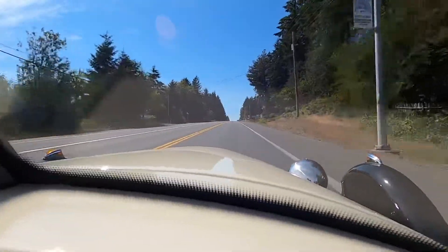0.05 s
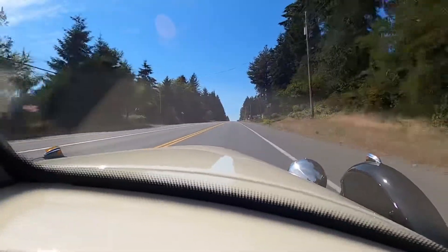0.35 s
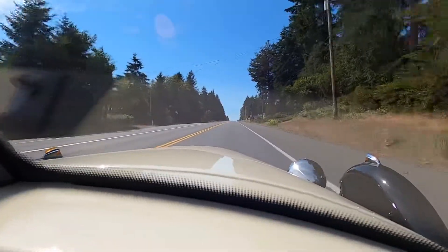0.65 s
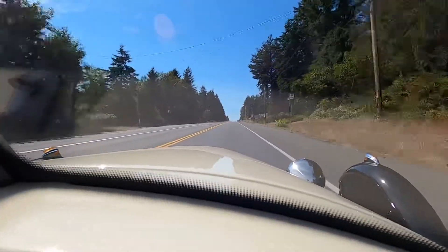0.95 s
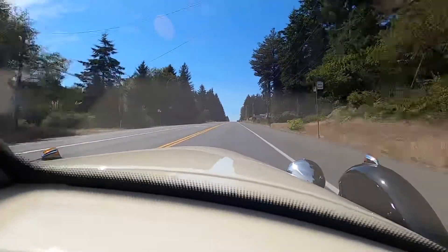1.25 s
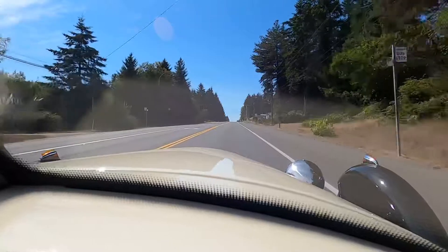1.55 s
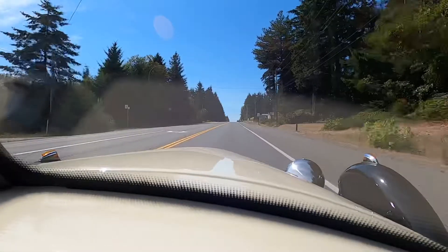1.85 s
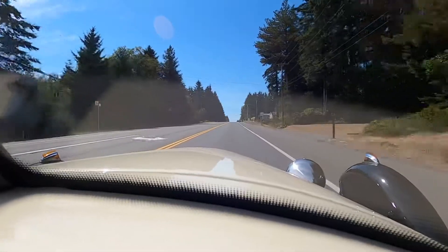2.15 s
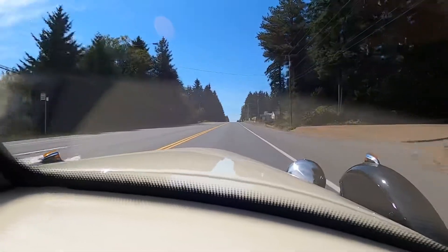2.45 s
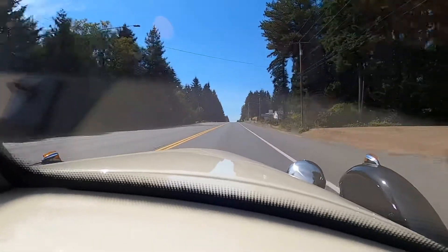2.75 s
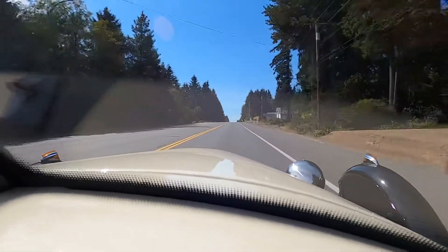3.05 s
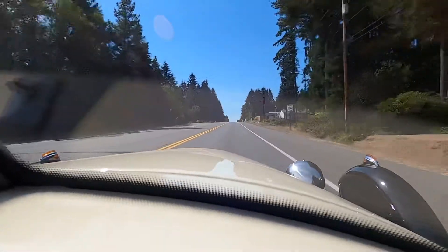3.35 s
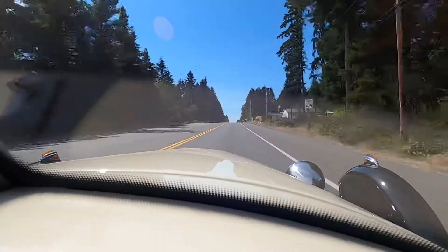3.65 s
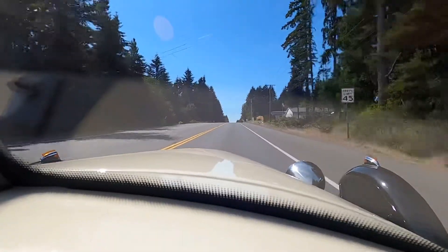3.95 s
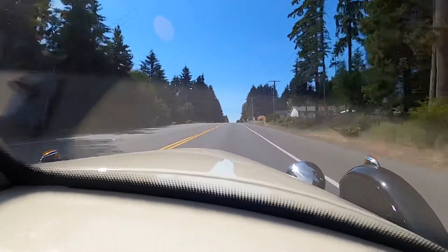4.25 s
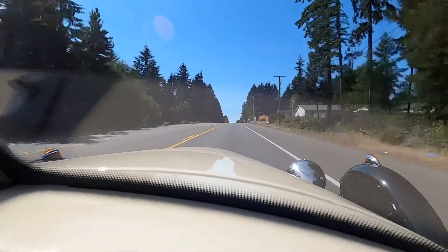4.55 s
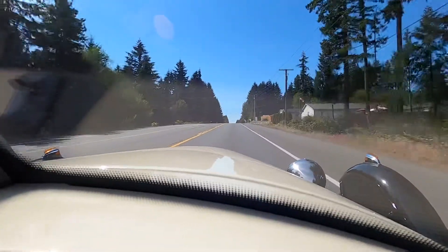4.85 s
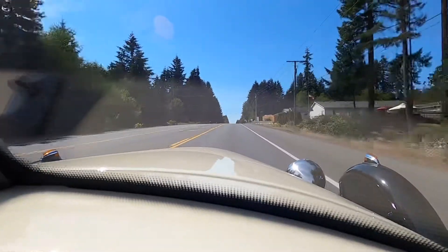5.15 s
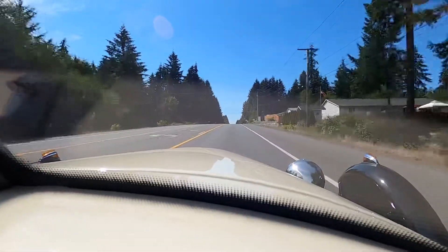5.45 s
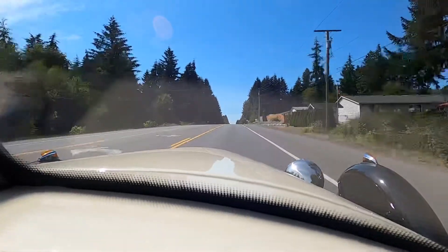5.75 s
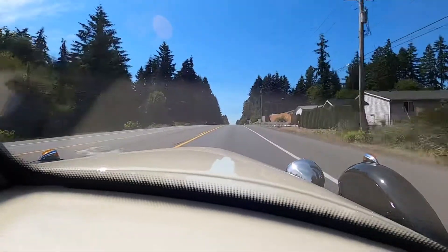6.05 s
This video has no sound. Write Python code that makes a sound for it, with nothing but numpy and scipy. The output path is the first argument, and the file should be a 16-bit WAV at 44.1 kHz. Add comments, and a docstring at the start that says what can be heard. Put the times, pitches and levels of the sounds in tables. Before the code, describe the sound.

A big air-cooled twin-cylinder engine is heard up close from the open cockpit of a moving car, running without a break for about six seconds. Its exhaust is the main sound, a deep, rapidly throbbing drone. The pitch creeps up very slightly from the start until about 5 seconds, then levels out and softens a touch as the car settles into a cruise. A thin gear and belt whine follows the engine, sinking to its weakest a little after 3 seconds, swelling again around 4 seconds and then easing. Faint, fast metallic valve ticking sits above the drone. Underneath, wind gives a low, lumpy buffet, along with a soft, fluttering hiss of air and tyres that lifts slightly in small gusts during the first second or so and again near 3 seconds.

```python
"""Three-wheeler on a country road

Heard from the open cockpit, a big air-cooled V-twin slowly gains speed and settles into a cruise.
Two unevenly spaced exhaust puffs per cycle ring the pipes and the body. Gears and drive belt whine,
the valve gear ticks, and the slipstream buffets and hisses around the little windscreen."""
import sys
import numpy as np
from scipy import signal
from scipy.fft import rfft, irfft
from scipy.io import wavfile

SR = 44100
rng = np.random.default_rng(int(sys.argv[2]) if len(sys.argv) > 2 else 0)


def unload_wav(signal):
    """Save mono or channel-first audio to the path in sys.argv[1] as 16-bit WAV at rate SR, clipped to [-1, 1]."""
    wavfile.write(
        sys.argv[1],
        SR,
        np.round(np.clip(np.atleast_2d(signal).T, -1, 1) * 32767).astype(np.int16),
    )


N = 278271

# Pipe and body resonances, with each cylinder's signed drive:
# pitch_hz, width_hz, leading_gain, trailing_gain
EXHAUST_MODES = [(36.6, 62, -1.3, -0.98), (52.8, 14, 4.84, 2.5), (103.7, 16.1, 2, 2.5),
                 (147.7, 25.4, -1.56, -1.53), (207, 16, -1.14, -2.16), (246.7, 42, 0.58, 0.46),
                 (282.2, 22.7, 0.4, -0.65), (305.6, 67, -0.86, -0.24), (398.5, 20, -0.26, -0.04),
                 (421.7, 30, -0.33, -0.23), (500, 45, -0.3556, -0.13), (559, 79, 0.18, -0.24),
                 (613, 109, -0.41, -0.23), (659.4, 19, 0.06, -0.27), (711.6, 13.5, -0.9, -1.61),
                 (794.5, 26, -0.4, -0.13), (874, 290, 1.1351, 0.774), (1094, 12, 0, 0.3)]
# Gear tones: waves_per_engine_cycle, relative_db, waver_share
GEAR_TONES = [(30, -28, .08), (60, -61, .6)]
# Belt tone: waves_per_engine_cycle, relative_db, waver_share
BELT_TONES = [(25.58, -40.5, .35)]
# Fader ride on the gear whine: time_s, gain_db
GEAR_RIDE = [(0, 3.5), (2.3, 0.6), (3.3, -2.5), (4.2, 3.5), (5.2, 1), (6.3, -0.6)]
# Valves opening and seating: place_cycles, low_ring_send_db, high_ring_send_db
VALVE_TAPS = [(.02, -1.5, -14), (.15, -23, -0.5), (0.329, -8, -5), (.40, -2, -12.5), (.52, -3, -14.5),
              (.68, -16.5, -2), (.91, -5, -6.5)]
# Low and high ring of the cylinder heads: pitch_hz, width_hz, relative_db
HEAD_RINGS = [(3435, 68, -49.5), (4750, 105, -58.5)]
# Fader ride on the ringing heads: time_s, gain_db
RING_RIDE = [(0, -1.3), (1.4, -2.3), (2.2, -0.5), (2.8, -3.5), (4.7, -4), (6.3, -3.5)]
# Tone curve of wind buffet and road roar: frequency_hz, relative_db
BUFFET_EQ = [(12, -10.5), (25, 3.5), (42, -2.5), (80, -1.5), (125, -5.5), (200, -11), (420, -15),
             (700, -17.5), (1030, -20.5), (1300, -33.5), (2500, -71)]
# Tone curve of slipstream and tyre hiss: frequency_hz, relative_db
HISS_EQ = [(700, -5), (1300, 2.5), (1900, 0.8), (2100, -1.5), (2450, 0.8), (3000, -5), (3700, -4),
           (4200, -10), (5100, -8.5), (6600, -17), (8100, -23), (8900, -37), (10000, -36), (11200, -49),
           (14500, -56)]
# Gusts that lift the hiss: peak_s, rise_db
GUSTS = [(0.12, 2), (0.63, 2), (1.24, 1), (3.06, 1.5)]

START_RPM, CLIMB_RPM_PER_S, CRUISE_RPM, EASE_OFF_RPM = 2715.87, 39.291, 2927.91, 26.38
FIRST_FIRING_CYCLES, TRAILING_LAG_CYCLES = .021, .397
LEADING_EASE_DB, TRAILING_EASE_DB = 0.5, 0.85   # each cylinder softens this much as the pull ends
EXHAUST_GAIN_DB, MUFFLER_HZ = 34, 624.2
TICKS_PER_S, TICK_DRIVE_DB, TICK_SPREAD_DB = 4.5, -50.5, 2.0
BUFFET_DB, HISS_DB, GUST_S = -26, -45.5, 0.06
TREBLE_SPLIT_HZ, TREBLE_FADE_DB_PER_S = 4500, 0.14


def exhaust(cycles, pull):
    """Each cylinder's puff booms through the same resonances from its own side; mufflers round it off."""
    leading = once_a_cycle(cycles, 0, spread_db=0.12, jitter_s=.00002)
    leading *= from_db(LEADING_EASE_DB * (pull - 3))
    trailing = once_a_cycle(cycles, TRAILING_LAG_CYCLES, spread_db=0.23, jitter_s=.00002)
    trailing *= from_db(TRAILING_EASE_DB * (pull - 2))
    boom = sum(resonate(leading_gain * leading + trailing_gain * trailing, hz, width_hz)
               for hz, width_hz, leading_gain, trailing_gain in EXHAUST_MODES)
    muffled = signal.sosfilt(signal.butter(5, MUFFLER_HZ, fs=SR, output="sos"), boom)
    # the thin header pipes ring ahead of the mufflers
    headers = resonate(resonate(leading + trailing, hz=1380, width_hz=150), hz=1380, width_hz=150)
    return from_db(EXHAUST_GAIN_DB) * muffled + from_db(-58.5) * rms_one(headers)


def engine_speed():
    """Crank rpm climbs, then levels out as the driver eases off; pull falls from 1 towards 0."""
    headroom = (CRUISE_RPM - START_RPM - CLIMB_RPM_PER_S * np.arange(N) / SR) / EASE_OFF_RPM
    rpm = CRUISE_RPM - EASE_OFF_RPM * np.logaddexp(0, headroom)
    pull = 1 / (1 + np.exp(-headroom))
    return rpm, pull


def driveline(cycles):
    """The gear whine sinks and swells while the belt keeps singing."""
    gears = fader(GEAR_RIDE) * whine(cycles, GEAR_TONES)
    belt = from_db(0.5) * whine(cycles, BELT_TONES)
    return gears + belt


def whine(cycles, tones):
    """Meshing teeth sing at set multiples of engine speed, wavering in level and phase."""
    out = np.zeros(N)
    for multiple, level_db, waver_share in tones:
        waver = (drift(rate_hz=4.7) + 1j * drift(rate_hz=2.6)) / np.sqrt(2)
        strength = np.sqrt(1 - waver_share ** 2) + waver_share * waver
        tone = np.real(strength * np.exp(2j * np.pi * multiple * cycles))
        out += from_db(level_db) * rms_one(tone)
    return out


def valve_gear(cycles):
    """Every valve contact rings the finned heads and sets off a short bright clatter in the rockers."""
    taps = np.array([once_a_cycle(cycles, place, spread_db=3.5, jitter_s=.0005)
                     for place, *_ in VALVE_TAPS])
    rings = 0
    for (hz, width_hz, level_db), send_db in zip(HEAD_RINGS, np.transpose(VALVE_TAPS)[1:]):
        drive = from_db(send_db) @ taps
        # a quickly damped chink leads into the longer ring
        chink = from_db(-15) * resonate(drive, hz, width_hz=140)
        rings += from_db(level_db) * rms_one(chink + resonate(drive, hz, width_hz))
    rocker_hits = taps.sum(axis=0) * from_db(1.6 * drift(rate_hz=60))
    clatter = from_db(-56.0) * rms_one(noise_bursts(rocker_hits, decay_s=0.0014))
    # bonnet and windscreen keep the very top from the cockpit
    cockpit_band = signal.butter(4, [2000, 5700], "band", fs=SR, output="sos")
    return signal.sosfilt(cockpit_band, fader(RING_RIDE) * rings + clatter)


def ticks():
    """Faint bright ticks land at random and die within a millisecond or two."""
    clicks = rng.random(N) < TICKS_PER_S / SR
    strength = from_db(TICK_DRIVE_DB + TICK_SPREAD_DB * rng.standard_normal(N))
    bursts = noise_bursts(clicks * strength, decay_s=0.00087)
    return resonate(resonate(bursts, hz=6500, width_hz=4000), hz=6500, width_hz=4000)


def slipstream():
    """Air and tyres lay a bed of lumpy low buffet and fluttering hiss that lifts with each gust."""
    t = np.arange(N) / SR
    gust_db = sum(rise_db * np.exp(-((t - peak_s) / GUST_S) ** 2) for peak_s, rise_db in GUSTS)
    buffet = from_db(BUFFET_DB + 0.97 * drift(rate_hz=5.5)) * coloured_noise(BUFFET_EQ)
    hiss = from_db(HISS_DB + gust_db + 1.4 * drift(rate_hz=60)) * coloured_noise(HISS_EQ)
    # the top of the hiss slowly grows fainter
    treble = signal.sosfilt(signal.butter(1, TREBLE_SPLIT_HZ, "high", fs=SR, output="sos"), hiss)
    return buffet + (hiss - treble) + from_db(-TREBLE_FADE_DB_PER_S * t) * treble


def once_a_cycle(cycles, place, spread_db, jitter_s):
    """A click each time the engine passes a place in its cycle, a little loose in level and timing."""
    passes = np.flatnonzero(np.diff(np.floor(cycles - place)) > 0)
    timing, strength = rng.standard_normal((len(passes), 2)).T
    onsets = np.round(passes + timing * jitter_s * SR).astype(int)
    clicks = np.zeros(N)
    clicks[np.clip(onsets, 0, N - 1)] = from_db(spread_db * strength)
    return clicks


def noise_bursts(clicks, decay_s):
    """Each click opens a burst of noise with an exponential tail."""
    envelope = signal.lfilter([1], [1, -np.exp(-1 / (decay_s * SR))], clicks + 1e-18)
    return envelope * rng.standard_normal(N)


def resonate(x, hz, width_hz):
    """A two-pole resonance with unity gain at its peak."""
    radius = np.exp(-np.pi * width_hz / SR)
    feedback = [1, -2 * radius * np.cos(2 * np.pi * hz / SR), radius ** 2]
    return signal.lfilter(np.array([1, 0, -1]) * (1 - radius ** 2) / 2, feedback, x + 1e-18)


def coloured_noise(eq):
    """Noise of unit rms shaped by a tone curve."""
    hz, db = np.transpose(eq)
    bins_hz = np.arange(1, N // 2 + 2) * SR / N
    gain = from_db(np.interp(np.log(bins_hz), np.log(hz), db))
    return rms_one(irfft(rfft(rng.standard_normal(N)) * gain, N))


def drift(rate_hz):
    """A smooth random wobble of unit rms, rolled off above rate_hz."""
    hz = np.arange(N // 2 + 1) * SR / N
    return rms_one(irfft(rfft(rng.standard_normal(N)) / (1 + (hz / rate_hz) ** 2), N))


def fader(ride):
    """Gain per sample, gliding between the points of a fader ride."""
    time_s, gain_db = np.transpose(ride)
    return from_db(np.interp(np.arange(N) / SR, time_s, gain_db))


def from_db(db):
    """Decibels to gain."""
    return 10 ** (np.asarray(db) / 20)


def rms_one(x):
    """Scale to unit rms."""
    return x / np.sqrt(np.mean(x ** 2) + 1e-20)


def scene():
    """The mono cockpit mix: exhaust, whine and valves locked to the engine, over ticks and wind."""
    rpm, pull = engine_speed()
    cycles = np.cumsum(rpm / 60 / 2) / SR - FIRST_FIRING_CYCLES   # two crank turns per cycle
    cycles += .00035 * drift(rate_hz=3)   # bumps in the road nudge the crank
    return (exhaust(cycles, pull) + driveline(cycles) + valve_gear(cycles) + ticks() + slipstream())[None]


def record(dry):
    """A steep high cut takes the very top off the mix."""
    stopband_hz = 15000
    return signal.sosfilt(signal.cheby2(12, 70, stopband_hz, fs=SR, output="sos"), dry)


dry = scene()
out = record(dry)
unload_wav(out)
```